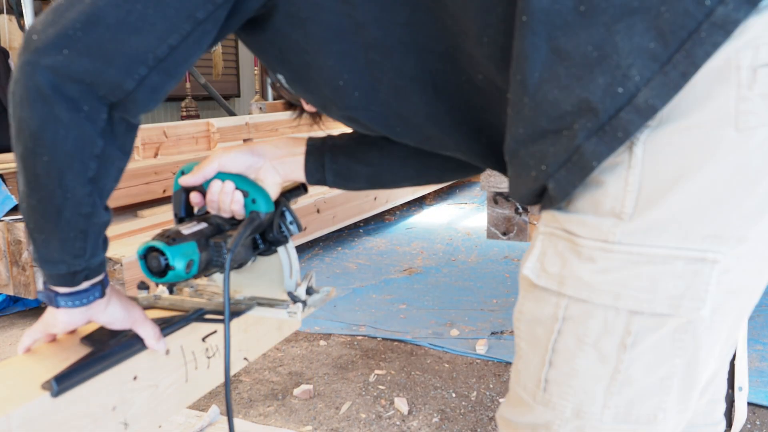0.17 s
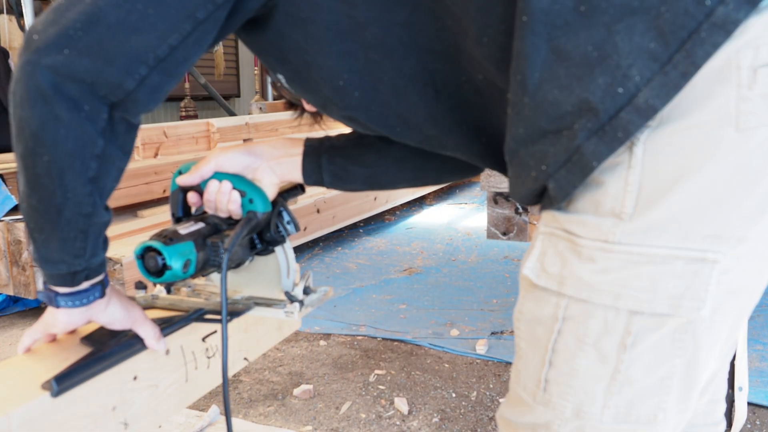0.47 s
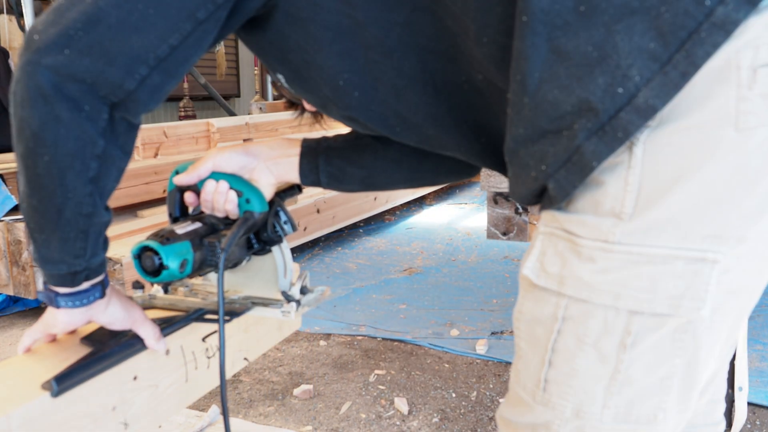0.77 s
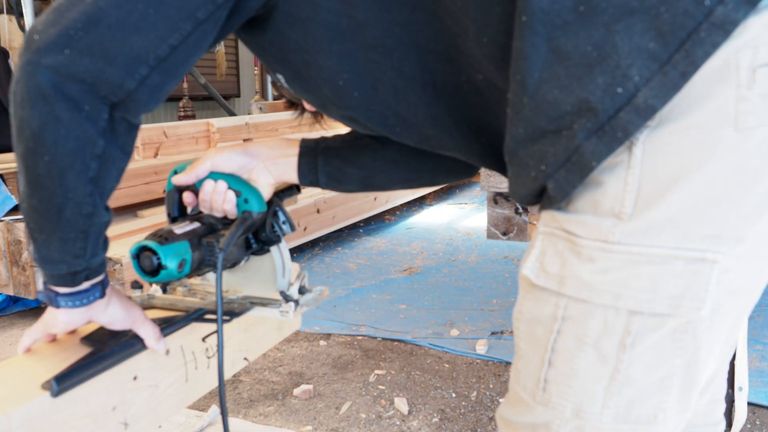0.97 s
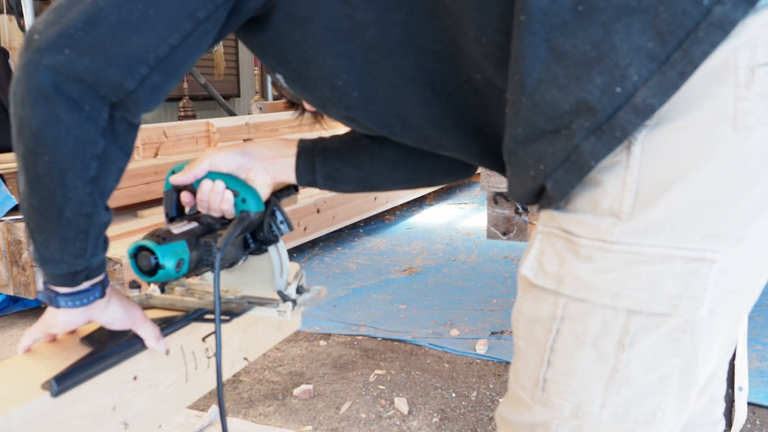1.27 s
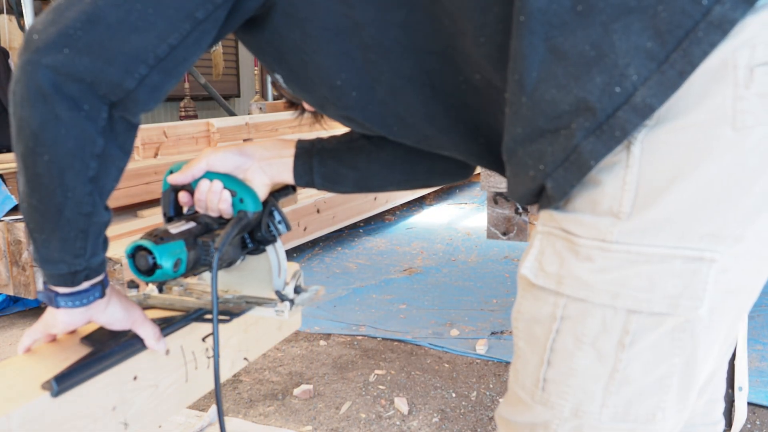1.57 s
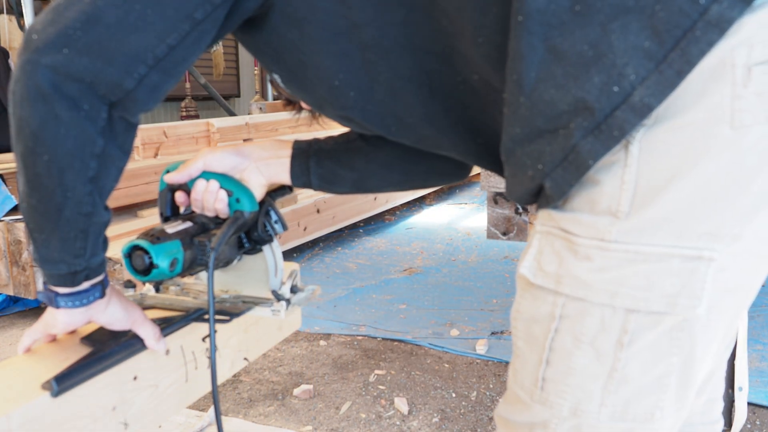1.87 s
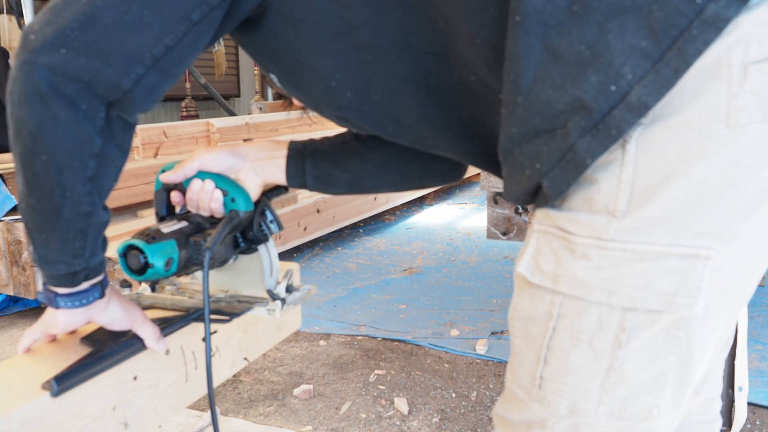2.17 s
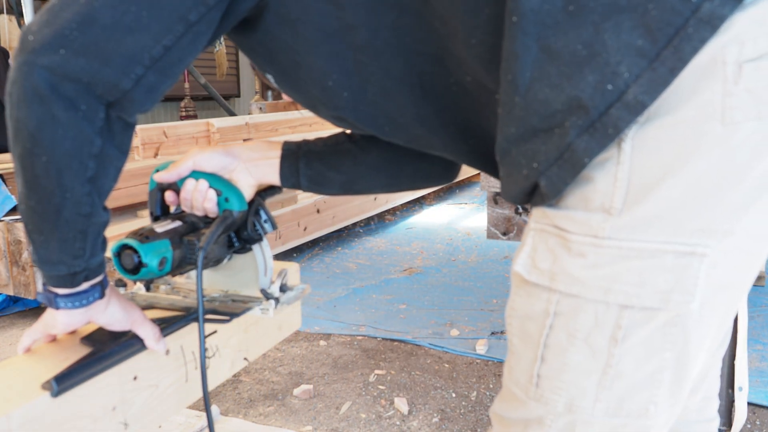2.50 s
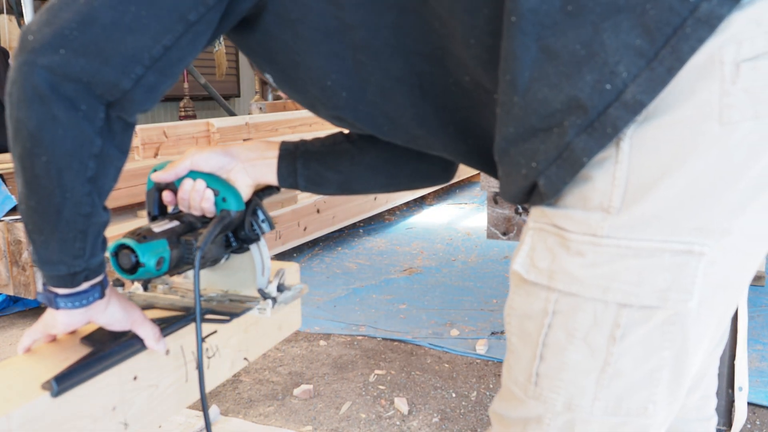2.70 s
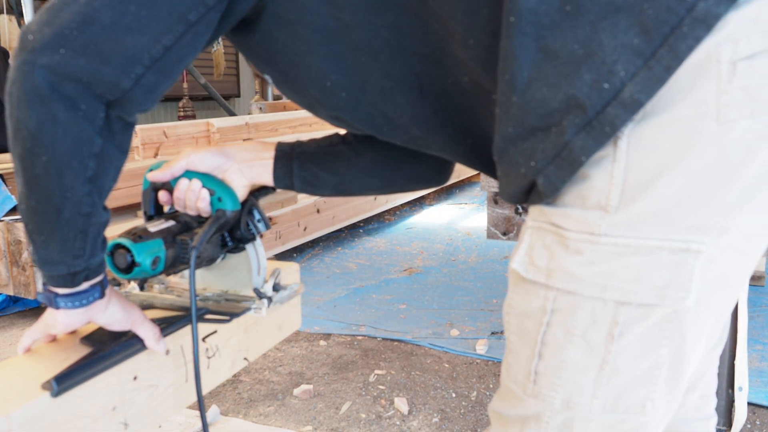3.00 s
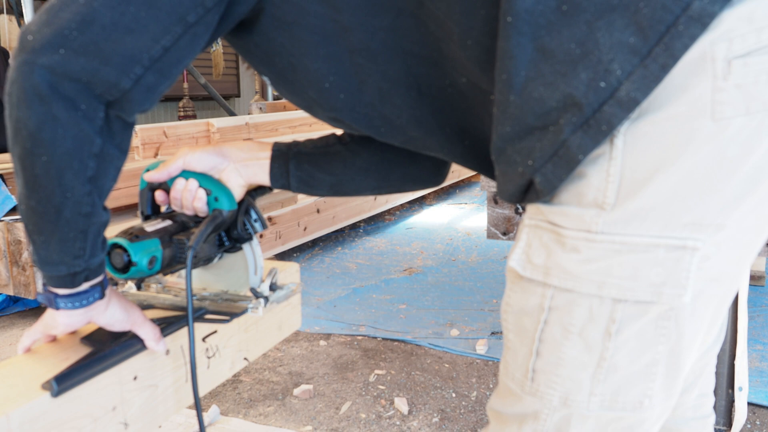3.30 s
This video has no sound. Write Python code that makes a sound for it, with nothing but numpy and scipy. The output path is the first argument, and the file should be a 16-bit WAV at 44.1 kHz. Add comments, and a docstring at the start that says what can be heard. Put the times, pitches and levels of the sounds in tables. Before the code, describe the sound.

Close single-channel pickup in a workshop: a circular saw already at full speed rips a thick beam, grainy tearing and constant whine, with metallic blade ringing and high sizzle growing later, and no wind-down.

```python
"""In a workshop, a handheld circular saw, already at its governed speed, rips along a thick timber beam.
After a moment of dull room noise the saw cuts in abruptly. The teeth tear the wood as noise in a rasp
that swells with each blade turn, and sawdust hisses out of the kerf (the slot being cut) as brighter noise.
Beam, housing and steel blade ring as narrow resonances driven by the tearing. The motor whines as tones
locked to its shaft speed, with a weak hum, a small thump, a few brief clean notes and a faint rumble."""
import sys
import numpy as np
from scipy import signal
from scipy.fft import rfft, irfft, next_fast_len
from scipy.io import wavfile
from scipy.ndimage import map_coordinates

SR = 44100
rng = np.random.default_rng(int(sys.argv[2]) if len(sys.argv) > 2 else 0)


def wav_record(signal):
    """Record a signal, one row per channel, as 16-bit PCM in the file named by sys.argv[1]."""
    frames = np.transpose(np.atleast_2d(signal))
    bounded = np.clip(frames, -1, 1)
    # unit amplitude maps onto the largest positive 16-bit level
    quanta = np.round(bounded * 32767).astype(np.int16)
    wavfile.write(sys.argv[1], SR, quanta)


N = 152145
TIME = np.arange(N) / SR
START_S = 0.103  # the saw cuts in
MOTOR_HZ, GEAR_RATIO, TEETH = 432.9, 6.5, 24  # typical shaft speed, shaft turns per blade turn, blade teeth


def from_db(db):
    """Turn decibels into a gain."""
    return 10 ** (np.asarray(db) / 20)


def rms_one(x):
    """Scale a sound to an rms (average strength) of 1."""
    return x / np.sqrt(np.mean(x ** 2) + 1e-20)


def in_time(rows):
    """Draw straight lines between (seconds, value) rows, giving a value at every sample."""
    return np.interp(TIME, *np.transpose(rows))


def drift(rate_hz):
    """Smooth random wandering around 0 with an rms of 1; a higher rate wanders faster."""
    # made at one fortieth of the sample rate, then filled in; the first 2000 values let it settle
    pole = np.exp(-80 * np.pi * rate_hz / SR)
    noise = rng.standard_normal(N // 40 + 2002)
    slow = signal.lfilter([1], [1, -2 * pole, pole * pole], noise)[2000:]
    return np.interp(np.arange(N) / 40, np.arange(len(slow)), rms_one(slow))


def colour(x, spectrum):
    """Make some pitches of a noise stronger than others, following a smooth curve; rms 1."""
    hz, db = np.transpose(spectrum)
    size = next_fast_len(N + SR // 10)
    bins_hz = np.maximum(np.fft.rfftfreq(size, 1 / SR), 1)
    gain = from_db(np.interp(np.log(bins_hz), np.log(hz), db))
    return rms_one(irfft(rfft(x, size) * gain, size)[:N])


def tearing(turns, force):
    """Wood fibres tear as noise that follows the force; part of the noise repeats with every blade turn."""
    repeat_share = 0.1  # share of the power
    size = int(SR * GEAR_RATIO / MOTOR_HZ)  # samples in about one blade turn
    again = map_coordinates(rng.standard_normal(size), [turns % 1 * size], order=1, mode="grid-wrap")
    fresh = rng.standard_normal(N)
    return force * (np.sqrt(repeat_share) * again + np.sqrt(1 - repeat_share) * fresh)


def resonate(turns, force, modes):
    """Parts of wood and steel ring at their own pitches, each shaken by tearing noise of its own."""
    out = 0
    for hz, width_hz, db in modes:
        pole = np.exp(-np.pi * width_hz / SR)
        feedback = [1, -2 * pole * np.cos(2 * np.pi * hz / SR), pole * pole]
        ring = signal.lfilter([1, 0, -1], feedback, tearing(turns, force))
        out = out + from_db(db) * rms_one(ring)
    return out


def rubbing(turns, force, modes, curve, gain_db=0, flicker_db=0):
    """Resonances swell and fade with the contact in the kerf, and may flicker at random."""
    level_db = gain_db + in_time(curve) + flicker_db * drift(15)
    return from_db(level_db) * resonate(turns, force, modes)


def tone(turns, multiple, db):
    """A fluttering tone whose pitch is a multiple of a rotation speed."""
    flutter = from_db(2.0 * drift(4.7))  # 2 dB rms
    phase = multiple * turns + rng.random()
    return from_db(db) * rms_one(flutter * np.sin(2 * np.pi * phase))


# Shaft speed, sagging a little under load. Each row: time in seconds, speed in turns per second.
SPEED = [(.1, 433.3), (.55, 432.7), (1.0, 433.3), (1.55, 433.3), (1.95, 432.0), (2.35, 432.2),
         (2.65, 432.9), (3.2, 432.3), (3.4, 433.2)]


def shaft_rotation():
    """Add up the shaft speed, with a small random wander, into shaft turns so far."""
    wander = 0.0009 * drift(8)  # share of the speed, rms
    return np.cumsum(in_time(SPEED) * (1 + wander)) / SR


# Uneven bite of the blade; a negative depth turns the swell upside down.
# Each row: time in seconds, depth of the swell in each turn in dB (before the force is reshaped).
RUNOUT = [(.1, 1.5), (.9, 1.5), (1.5, 0), (2.0, -0.7), (2.5, 0.2), (3.45, -0.2)]


def tooth_force(turns):
    """Cutting force: a pulse per tooth, some teeth keener, with a swell per blade turn and a judder."""
    tooth_spread_db, bite_spread_db = 0.9, 1.0
    warp = 0.47  # a second swell, twice per turn, as a share of the first
    tooth_pulse = 0.33  # depth of each tooth's pulse
    judder_hz, judder_db = 15.1, 0.35
    bite = (turns * TEETH).astype(int)
    keenness = rms_one(rng.standard_normal(TEETH))[bite % TEETH]
    grain = rng.standard_normal(N)[bite]
    swell = np.sin(2 * np.pi * turns) + warp * np.sin(4 * np.pi * turns)
    force_db = tooth_spread_db * keenness + bite_spread_db * grain + in_time(RUNOUT) * swell
    force_db += judder_db * np.sin(2 * np.pi * (judder_hz * TIME + rng.random()))
    pulse = 1 + tooth_pulse * np.cos(2 * np.pi * TEETH * turns)
    return rms_one(from_db(force_db) * pulse)


# Colour of the rasp. Each row: pitch in Hz, relative strength in dB per Hz.
RASP = [(30, -26), (100, -46), (170, -27.5), (230, -16.5), (330, -12), (420, -4), (500, 1), (590, -2),
        (670, 9), (900, 6.5), (1350, 5), (1900, 7.5), (2200, 4.5), (3300, 6), (4000, -2), (6000, -35),
        (16000, -42)]
# Each row: time in seconds, rasp level in dB before its gain.
RASP_LEVEL = [(.11, -43), (.45, -41), (.75, -41.5), (1.2, -41.5), (1.55, -41), (1.75, -42), (2, -41.5),
              (2.08, -42.5), (2.3, -41.5), (2.6, -42), (2.85, -43), (3.12, -41.5), (3.33, -43.5),
              (3.45, -42)]
# Resonances of the beam and the housing. Each row: pitch in Hz, width in Hz, relative level in dB.
BODY = [(803, 79, -10), (1076, 39, -7), (1142, 62, -9.5), (1340, 73, -15)]
# Each row: time in seconds, level of these resonances in dB.
BODY_LEVEL = [(.11, -52), (.45, -46), (.8, -47), (1.25, -43.5), (1.45, -47), (2.1, -45.5), (2.36, -43),
              (2.75, -43.5), (3.07, -41), (3.3, -43), (3.45, -40)]
# A higher resonance of the beam that opens late in the cut.
# Each row: pitch in Hz, width in Hz, relative level in dB.
HOLLOW = [(1567, 82, 0.5)]
# Each row: time in seconds, level of this resonance in dB.
HOLLOW_LEVEL = [(.11, -60), (.9, -54), (1.25, -51.5), (1.6, -54), (2.15, -54), (2.35, -49), (2.6, -51.5),
                (2.9, -50), (3.07, -44), (3.25, -52), (3.45, -50)]


def wood(turns, force):
    """The torn fibres rasp, surging on harder grain, and set the beam and the housing ringing."""
    rasp_gain_db = 1.5
    surge_db, surge_hz = 0.55, 22
    softer = force ** 0.76  # evens out the force
    level_db = rasp_gain_db + in_time(RASP_LEVEL) + surge_db * drift(surge_hz)
    rasp = from_db(level_db) * colour(tearing(turns, softer), RASP)
    hollow = rubbing(turns, softer, HOLLOW, HOLLOW_LEVEL)
    body = rubbing(turns, softer, BODY, BODY_LEVEL)
    return rasp + hollow + body


# Colour of the hiss. Each row: pitch in Hz, relative strength in dB per Hz.
HISS = [(1500, -29.5), (3300, -1.5), (4500, 2.5), (5800, 2), (7000, 1), (8500, 4), (9700, 3), (11300, -1),
        (13900, -5.5), (15900, -2)]
# Each row: time in seconds, hiss level in dB before its gain.
HISS_LEVEL = [(0.11, -44.0), (0.23, -43), (0.35, -44.5), (0.44, -41.5), (0.65, -45.5), (0.74, -41),
              (0.83, -45), (1.82, -43), (1.88, -44.9), (2.06, -42), (2.56, -44.5), (2.86, -43), (2.89, -46),
              (3.1, -42.5), (3.37, -47), (3.45, -42.5)]


def sawdust(turns, force):
    """Dust and chips thrown out by the teeth hiss as bright noise that follows the force."""
    hiss_gain_db = 4
    level_db = hiss_gain_db + in_time(HISS_LEVEL) + 0.5 * drift(13)
    return from_db(level_db) * colour(tearing(turns, force ** 0.77), HISS)


# Steady rings of the blade. Each row: pitch in Hz, width in Hz, level in dB before a shared gain.
BLADE = [(2448, 38, -56), (3540, 16, -61), (3827, 40, -60.5), (4415, 200, -51), (4810, 120, -59.5),
         (6150, 70, -59.5), (6510, 30, -62), (7190, 49, -60), (7440, 50, -62.5), (7560, 43, -57.5),
         (7820, 41, -62.5), (10140, 45, -66), (10540, 35, -67)]
# Rings of the blade near 3 kHz, strongest between about 2 and 3.2 seconds.
# Each row: pitch in Hz, width in Hz, relative level in dB.
HOWL = [(2958, 50, -3), (3020, 70, -5)]
# Each row: time in seconds, howl level in dB.
HOWL_LEVEL = [(.11, -52), (.55, -48.5), (1.0, -50), (1.5, -48.5), (2.0, -45.5), (2.6, -43.5), (3.15, -45),
              (3.3, -52), (3.45, -47)]
# A very narrow ring, close to a pure note. Each row: pitch in Hz, width in Hz, relative level in dB.
WHISTLE = [(3274, 8, 0)]
# Each row: time in seconds, whistle level in dB.
WHISTLE_LEVEL = [(.11, -60), (.3, -58), (.45, -47), (.56, -58), (.8, -55.5), (1.15, -53), (1.55, -49.5),
                 (1.8, -57), (2.6, -65), (3.45, -63)]
# A narrow and a broad high ring. Each row: pitch in Hz, width in Hz, relative level in dB.
SCREECH = [(8738, 65, -7.5), (8800, 450, -11)]
# Each row: time in seconds, screech level in dB before its gain.
SCREECH_LEVEL = [(.11, -51), (.42, -44), (.72, -50), (1.02, -43), (1.22, -47), (1.48, -43), (1.7, -50),
                 (1.9, -50), (2.1, -46.5), (2.55, -49), (2.85, -46.5), (3.45, -48)]


def blade_rings(turns, force):
    """The teeth shake the steel disc, which rings at its own pitches."""
    out = from_db(0.5) * resonate(turns, force, BLADE)
    out += rubbing(turns, force, HOWL, HOWL_LEVEL, flicker_db=1.1)
    out += rubbing(turns, force, WHISTLE, WHISTLE_LEVEL)
    return out + rubbing(turns, force, SCREECH, SCREECH_LEVEL, gain_db=3.5)


# Narrow rings that come and go as the blade rubs in the kerf.
# Each row: pitch in Hz, width in Hz, relative level in dB.
SING = [(10625, 30, -4), (11025, 22, -3)]
# Each row: time in seconds, level of these rings in dB before their gain.
SING_LEVEL = [(.11, -60), (.7, -61), (1.2, -61), (1.52, -46), (1.72, -56), (2.4, -53), (2.65, -54),
              (3.2, -50), (3.45, -59)]
# Broad scuffing of the blade's side on the wood. Each row: pitch in Hz, width in Hz, relative level in dB.
SCUFF = [(10560, 380, -2), (10900, 380, -4)]
# Each row: time in seconds, scuffing level in dB before its gain.
SCUFF_LEVEL = [(.11, -62), (1.15, -54), (1.47, -46), (1.72, -55), (2.45, -52), (2.65, -47), (2.85, -50),
               (3.2, -44), (3.37, -53), (3.45, -53)]
# High rings of the blade. Each row: pitch in Hz, width in Hz, relative level in dB.
SIZZLE = [(11650, 160, -9), (11800, 130, -6.5), (12040, 75, -4), (12150, 110, -7.5)]
# Each row: time in seconds, sizzle level in dB before its gain.
SIZZLE_LEVEL = [(.11, -51), (.33, -50), (.46, -45), (.62, -52), (.9, -48.5), (1.65, -48.5), (2.0, -43.5),
                (2.2, -47.5), (2.95, -45), (3.05, -48), (3.16, -44), (3.38, -52), (3.45, -44)]
# The highest-pitched rings of the blade. Each row: pitch in Hz, width in Hz, relative level in dB.
FIZZ = [(12590, 130, -5), (12850, 220, -7.5), (13170, 220, -7.5), (13420, 170, -5), (14350, 450, -9.5)]
# Each row: time in seconds, fizz level in dB.
FIZZ_LEVEL = [(.11, -48), (.44, -44.5), (.68, -49), (.9, -48), (1.5, -45.5), (2.05, -42.5), (2.42, -39.5),
              (2.75, -43.5), (2.97, -41), (3.04, -44.5), (3.2, -39.5), (3.38, -46), (3.45, -43)]


def blade_spurts(turns, force):
    """The kerf grabs the blade unevenly and rubs its highest-pitched rings in spurts."""
    snatch_db, snatch_hz = -0.7, 90
    # a power above 1 sharpens the force into spurts
    spurts = force ** 2.2 * from_db(snatch_db * drift(snatch_hz))
    out = rubbing(turns, spurts, SING, SING_LEVEL, gain_db=1.5, flicker_db=2.0)
    out += rubbing(turns, spurts, SCUFF, SCUFF_LEVEL, gain_db=1.5)
    out += rubbing(turns, spurts, SIZZLE, SIZZLE_LEVEL, gain_db=2)
    return out + rubbing(turns, spurts, FIZZ, FIZZ_LEVEL)


# Motor whine. Each row: multiple of the shaft speed, level in dB halfway through, growth in dB per second.
WHINE = [(4, -56, -1.2), (7, -66, 0), (8, -56, 1.3), (9, -61.5, 0), (10, -60.5, 1.4), (12, -64, 0),
         (15, -63, 0), (16, -62, 0), (23, -64.5, -1.5)]
# Hum of the turning blade and gear. Each row: multiple of the blade speed, level in dB.
BLADE_HUM = [(2, -88.5), (3, -88), (5.5, -74.5), (7.5, -65), (23, -68)]


def motor(shaft, turns):
    """The shaft tone beats with the gear; fan and commutator whine above it, and the blade hums."""
    shaft_db, fade_db_per_s = -58.5, 1.15  # the tone fades as the saw moves on
    gear_wobble = 0.22
    from_middle = TIME - TIME.mean()
    beat = 1 + gear_wobble * np.sin(2 * np.pi * turns)
    shaft_tone = rms_one(beat * np.sin(2 * np.pi * shaft))
    out = from_db(shaft_db - fade_db_per_s * from_middle) * shaft_tone
    for multiple, db, growth in WHINE:
        out += tone(shaft, multiple, db + growth * from_middle)
    for multiple, db in BLADE_HUM:
        out += tone(turns, multiple, db)
    return out


def hum():
    """The saw's body gives a weak low hum: a tone that wavers in pitch and level."""
    centre_hz, wander, level_db, flicker_db = 222, 0.07, -79, 5.5  # wander is a share of the pitch
    phase = np.cumsum(centre_hz * (1 + wander * drift(4.16))) / SR
    flicker = from_db(flicker_db * drift(5.6))
    return from_db(level_db) * rms_one(flicker * np.sin(2 * np.pi * phase))


# Brief clean notes, the first two centred just before the saw cuts in.
# Each row: middle in seconds, pitch in Hz, level in dB at the middle, half length in seconds.
CLEAN_NOTES = [(.082, 3510, -76, .02), (.085, 4680, -77, .02), (3.385, 3470, -48, .035),
               (3.439, 5050, -39.5, 0.0053), (3.443, 7350, -47, .005)]


def clean_notes():
    """Brief clean notes swell and die again: pure tones under a smooth bell-shaped level."""
    out = 0
    for middle_s, hz, db, half_s in CLEAN_NOTES:
        bell = np.exp(-((TIME - middle_s) / half_s) ** 2)
        note = np.sqrt(2) * np.sin(2 * np.pi * (hz * TIME + rng.random()))
        out = out + from_db(db) * bell * note
    return out


def thump():
    """A soft low bump as the saw cuts in: a low tone that dies away very quickly."""
    level_db, hz, decay_s = -54, 90, 0.0025
    age = np.maximum(TIME - START_S, 0)
    return from_db(level_db) * np.exp(-age / decay_s) * np.sin(2 * np.pi * hz * age)


# Colour of the noise before the saw. Each row: pitch in Hz, relative strength in dB per Hz.
WORKSHOP = [(24, -40), (40, -24), (177, -20), (244, -15), (284, -1), (346, -14), (554, -10), (597, -7),
            (643, -8), (1400, -7), (2700, -19.5), (4500, -26), (7000, -33.5), (15000, -45)]


def workshop_noise():
    """Dull workshop noise, made by colouring random noise."""
    return from_db(-55.5) * colour(rng.standard_normal(N), WORKSHOP)


# Colour of the rumble. Each row: pitch in Hz, relative strength in dB per Hz.
RUMBLE = [(20, -7), (42, 3), (80, -10), (130, -4), (250, 5), (1000, -44)]


def low_rumble():
    """A very faint low rumble throughout, made by colouring random noise."""
    return from_db(-86) * colour(rng.standard_normal(N), RUMBLE)


def scene():
    """One shaft turns the motor and, through the gear, the blade; the saw takes over from the room noise."""
    shaft = shaft_rotation()
    turns = shaft / GEAR_RATIO
    force = tooth_force(turns)
    saw = wood(turns, force) + sawdust(turns, force)
    saw += blade_rings(turns, force) + blade_spurts(turns, force)
    saw += motor(shaft, turns) + hum()
    main = np.where(TIME < START_S, workshop_noise(), saw)
    return (main + clean_notes() + thump() + low_rumble())[None]


def record(dry):
    """A steep low-pass filter removes nearly everything above 15750 Hz."""
    low_pass = signal.ellip(12, 0.1, 80, 15750, fs=SR, output="sos")
    return signal.sosfilt(low_pass, dry)


dry = scene()
out = record(dry)
wav_record(out)
```